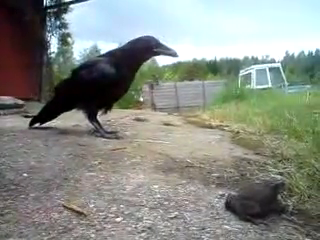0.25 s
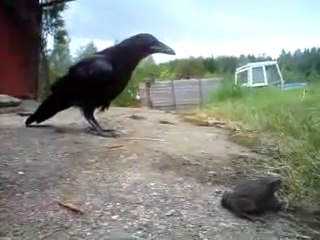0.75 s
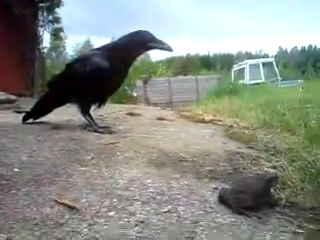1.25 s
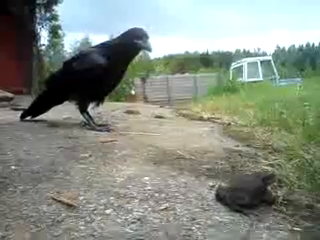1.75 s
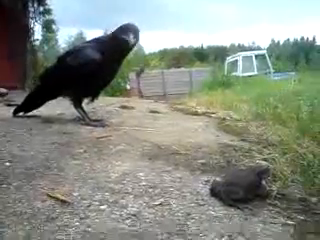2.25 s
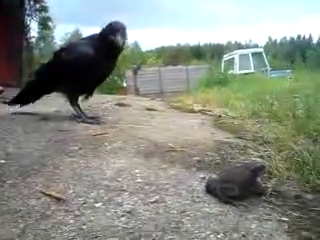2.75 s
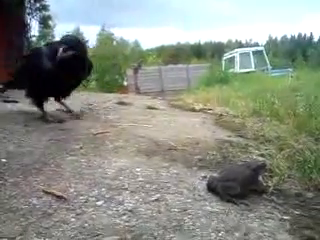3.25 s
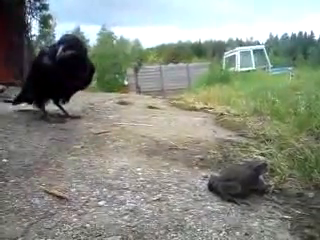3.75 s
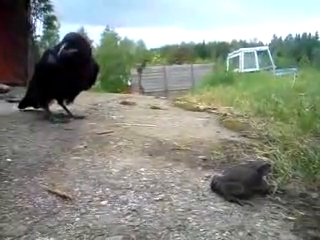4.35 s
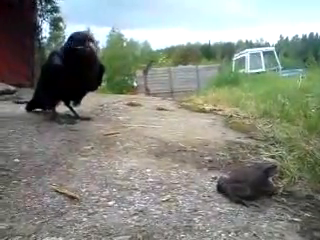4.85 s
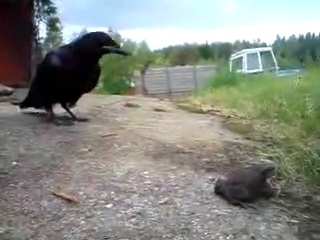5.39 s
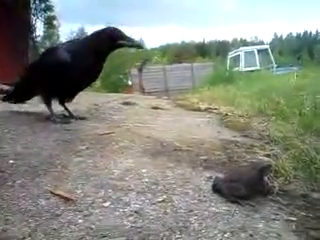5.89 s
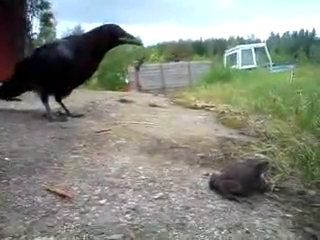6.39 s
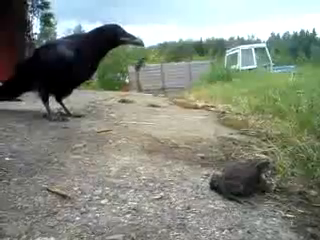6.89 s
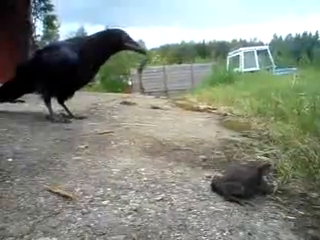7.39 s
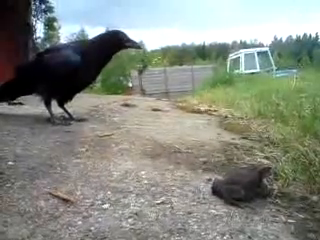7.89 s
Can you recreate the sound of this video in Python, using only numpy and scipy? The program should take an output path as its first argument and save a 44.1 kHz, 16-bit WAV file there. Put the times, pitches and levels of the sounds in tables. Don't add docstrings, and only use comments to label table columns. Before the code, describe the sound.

A large black bird gives four harsh, throaty croaks close by, with sharp bill clicks on stone and small songbirds whistling over soft leaf hiss.

```python
import sys
import numpy as np
from scipy import signal
from scipy.io import wavfile
from scipy.ndimage import uniform_filter1d

SR = 44100
rng = np.random.default_rng(int(sys.argv[2]) if len(sys.argv) > 2 else 0)


def natural_amplitude(level_db):
    exponent = np.asarray(level_db, float) / 20
    return 10 ** exponent


def master(y):
    cut = np.clip(np.atleast_2d(y).T, -1, 1)
    pcm = np.round(cut * 32767)
    wavfile.write(sys.argv[1], SR, pcm.astype(np.int16))


N = 358533


def evened(x):
    return x / np.sqrt(np.mean(x ** 2) + 1e-20)


def read(points, hz):
    f, value = np.transpose(points)
    return np.interp(np.log(hz + 1), np.log(f + 1), value)


def layer(sounds):
    track = np.zeros(N)
    for start, sound in sounds:
        part = track[round(start * SR):][:len(sound)]
        part += sound[:len(part)]
    return track


def drift(length, smooth):
    once = uniform_filter1d(rng.standard_normal(length), int(smooth))
    return evened(uniform_filter1d(once, int(smooth)))


def resonate(x, hz, width):
    return signal.lfilter(*signal.iirpeak(hz, hz / width, SR), x)


def lowpass(x, order, hz):
    return signal.sosfilt(signal.butter(order, hz, fs=SR, output="sos"), x)


def swells(rows, calm_db):
    t = np.arange(N) / SR
    power = natural_amplitude(calm_db) ** 2
    for start, db, half in rows:
        power = power + natural_amplitude(db) ** 2 * np.exp(-2 * ((t - start) / half) ** 2)
    return np.sqrt(power)


# (frequency [Hz], density [dB per Hz])
HISS_COLOUR = [(18, -31), (30, 0), (134, -21), (179, -11), (442, -7), (575, -8), (632, -8.5), (1230, -10.5),
               (1800, -10), (5140, -14), (5650, -15.5), (6840, -17), (8890, -26), (11600, -59),
               (19600, -120)]
# (time [s], peak level [dB], half length [s])
BREEZES = [
    (1.25, -49, 0.13),
    (3.15, -52.5, 0.5),
    (4.05, -56, 0.6),
    (5.3, -54, 1.22),
    (6.9, -52.5, 0.61),
]


def hiss(raven):
    still_db, haze_db, haze_s = -55, -25.5, 0.36
    frames, hz = N // 256 + 5, np.fft.rfftfreq(1024, 1 / SR)
    real, imaginary, patches = rng.standard_normal((frames, 513, 3)).T
    patches = evened(uniform_filter1d(uniform_filter1d(patches, size=12, axis=0), size=10, axis=1))
    spectrum = (real + 1j * imaginary) * natural_amplitude(read(HISS_COLOUR, hz)[:, None] + patches)
    noise = evened(signal.istft(spectrum, nperseg=1024, noverlap=768)[1][:N])
    keep = np.exp(-1 / (haze_s * SR))
    haze = natural_amplitude(haze_db) ** 2 * signal.lfilter([1 - keep], [1, -keep], raven ** 2)
    dull = lowpass(noise, 4, 7600)
    return swells(BREEZES, still_db) * noise + np.sqrt(haze) * dull[::-1]


# (time [s], peak level [dB], half length [s])
GUSTS = [(.9, -52.5, .05), (1.2, -60, 0.17), (1.315, -53, 0.038), (2.01, -55, .06), (2.15, -58, 0.041),
         (2.31, -56, .1), (2.8, -55, .15), (3.18, -55, .14), (3.87, -72, 0.083), (4.14, -58, 0.054),
         (4.66, -59, 0.39), (5.2, -62.5, 0.56), (5.59, -53, 0.04), (6.33, -54, 0.024), (6.64, -60, 0.072),
         (7.05, -61, 0.97), (7.86, -59, 0.088), (8.13, -58, 0.087)]


def wind():
    lumps = rng.standard_normal(N) * natural_amplitude(2.2 * drift(N, 900))
    low = signal.sosfilt(signal.butter(1, [35, 120], "band", fs=SR, output="sos"), lumps)
    return swells(GUSTS, calm_db=-63.5) * evened(lowpass(low, 2, 330))


def chirp(start, db, hz):
    u = np.linspace(0, 1, round(0.049 * SR))
    tremble = .04 * drift(len(u), 24)
    tone = np.sin(2 * np.pi * np.cumsum(hz * (1.07 - .14 * u + tremble)) / SR)
    return start, natural_amplitude(db - 8.0 + 6.6 * drift(len(u), 50)) * tone * np.sin(np.pi * np.sqrt(u))


# (time [s], peak level [dB], middle pitch [Hz])
CHIRPS = [(0.1795, -51.5, 5800), (0.283, -51, 5780), (0.381, -50.5, 5950), (0.4918, -48.5, 6000),
          (0.6264, -51, 5570), (0.7233, -52.5, 5970), (3.7563, -52, 5400), (3.8472, -44, 5070),
          (3.94, -44, 5390), (4.104, -51, 5300), (4.188, -45.5, 5220), (5.0194, -40, 5780),
          (5.129, -47, 5280), (5.226, -46.5, 6270), (5.7084, -51, 5900), (5.789, -53, 5300),
          (5.8754, -51.5, 5300), (7.644, -47, 5070), (7.7263, -45, 5640)]


def chirps():
    return layer(chirp(*row) for row in CHIRPS)


def whistle(start, length, db, start_hz, end_hz, blur, ease):
    u = np.linspace(1, 0, round(length * SR))
    hz = end_hz + (start_hz - end_hz) * u ** ease
    tone = np.sin(2 * np.pi * np.cumsum(hz * (1 + .004 * blur * drift(len(u), 90))) / SR)
    swell = signal.windows.tukey(len(u), .55)
    return start, np.sqrt(2) * natural_amplitude(db + 2.2 * blur * drift(len(u), 130)) * tone * swell


SLIDE_EASE = 1.2

# (time [s], length [s], level [dB], start pitch
# [Hz], end pitch [Hz])
FAR_NOTES = [(2.322, 0.026, -54, 4150, 4150), (2.36, .045, -61, 3700, 4150), (2.57, 0.044, -60, 1850, 2150),
             (2.71, 0.028, -53, 4400, 4130), (2.75, .05, -59, 3900, 4100), (2.84, 0.064, -54, 2350, 2960),
             (3.075, 0.048, -53, 2950, 2800), (3.31, 0.17, -55.5, 3600, 3430),
             (3.48, 0.017, -56, 3650, 4170), (4.114, .03, -47, 4400, 4500), (4.136, 0.024, -40, 4600, 4450),
             (4.17, 0.061, -59, 4500, 4300), (4.75, .075, -50.5, 2850, 2910),
             (6.18, 0.059, -62, 3500, 3560), (6.6, .04, -52, 3560, 3720),
             (.26, 0.12, -64, 4310, 4280), (.42, 0.13, -68, 4300, 4300), (.45, 0.067, -62, 4490, 4550),
              (.53, 0.17, -63.5, 4340, 4240), (7.45, .045, -59, 4950, 5100), (7.53, 0.1, -59, 5200, 4990),
              (7.615, .085, -75, 4890, 5100), (7.71, 0.042, -56.5, 5000, 4930),
              (8.07, .058, -59, 5150, 5150)]
# (time [s], length [s], level [dB], start pitch [Hz], end pitch [Hz])
SCRATCHES = [(3.9, .03, -58, 2750, 2950), (3.92, .03, -60, 3400, 3300), (3.93, .02, -56, 2900, 3100),
             (3.945, .03, -53, 2700, 2550), (3.965, .03, -54, 3250, 3450), (3.99, .04, -57, 2650, 2550),
             (3.995, .03, -60, 3300, 2950), (4.17, .05, -61, 2700, 2450), (5.945, .03, -59, 3700, 3300),
             (5.995, .02, -55, 3500, 3350), (6.01, .025, -56, 3100, 2850), (6.04, .05, -60, 3900, 3000)]


def distant_birds():
    whistles = layer(whistle(*row, 1.6, SLIDE_EASE) for row in FAR_NOTES)
    return whistles + layer(whistle(*row, 3, SLIDE_EASE) for row in SCRATCHES)


def click(start, db, hz, ring_ms, knock_db, rustle_db):
    t = np.arange(round(.25 * SR)) / SR
    ring = np.sin(2 * np.pi * hz * t) * np.exp(-1000 * t / ring_ms) * np.minimum(t / .0002, 1)
    knock = np.sin(2 * np.pi * 1250 * t) * np.exp(-t / .0009) * np.minimum(t / .0006, 1)
    grit = rng.standard_normal(len(t)) * natural_amplitude(4.8 * drift(len(t), 40))
    rustle = evened(resonate(resonate(grit, 3000, 4000), 2500, 8200)) * np.exp(-t / 0.046)
    return start, natural_amplitude(db) * (ring + natural_amplitude(knock_db) * knock + natural_amplitude(rustle_db) * rustle)


# (time [s], peak level [dB], ring pitch [Hz], low knock [dB])
STEPS = [
    (0.4228, -31, 2150, -6),
    (2.3213, -30, 3930, 0),
    (3.0182, -26, 3850, -15),
    (3.553, -31.5, 4000, -20),
    (6.31, -30, 3500, 4.5),
]


def claw_steps():
    return layer(click(s, db, hz, 0.78, knock_db, rustle_db=-19) for s, db, hz, knock_db in STEPS)


def gesture(call, attack_s, release_s, depth):
    start, length, db, top_hz, crest = call
    age = np.arange(0, length, 1 / SR)
    u, dying = age / length, np.clip(1 - (length - age) / release_s, 0, 1)
    effort_db = db - 22 * np.exp(-(age / attack_s) ** 1.4) - 20 * dying ** 1.4
    rising = (1 - .73) * np.clip(1 - u / crest, 0, 1) ** 2.1
    falling = (1 - .62) * np.clip((u - crest) / (1 - crest), 0, 1) ** 3.8
    rest = np.clip((age + 0.062 - length) / .015, 0, 1)
    throb_depth = depth * (1 - (1 - .25) * rest) + 0.734 * np.exp(-age / 0.03)
    return start + age, effort_db, top_hz * (1 - rising - falling), throb_depth


def vocal_folds(shape, rough, throb, colour):
    t, _, hz, depth = shape
    first_s, early, late = throb
    swing, under, low_db, _ = colour
    age, n = t - t[0], len(t)
    fresh = np.exp(-age / .018)
    rate = (early + (late - early) * age / age[-1]) * (1 + .35 * fresh)
    rate = rate * (1 + .45 * rough * drift(n, 260))
    flap = 2 * np.pi * (np.cumsum(rate) / SR - (first_s - t[0]) * rate[0])
    squeeze = np.exp((depth + 3.5 * fresh) * (np.cos(flap) - 1)) * natural_amplitude(5.0 * rough * drift(n, 220))
    dip = swing * np.minimum(2 * depth, 1) * (1 + np.sin(flap - .8)) ** 2 / 2
    bend = 1 - dip + .13 * rough * drift(n, 80)
    turns = 2 * np.pi * np.cumsum(hz * bend) / SR
    uneven = 1 + np.minimum(under, .45) * (1 + drift(n, 500)) * np.cos(turns / 2)
    lag = .3 * np.arange(14) ** 2
    fundamental = natural_amplitude(low_db - 19 * np.log2(hz / 609)) * np.cos(turns)
    upper = sum(np.cos(k * turns - lag[k]) for k in range(2, 14))
    folds = evened(fundamental + uneven * upper)
    puffs = evened((0.13 + np.maximum(folds, 0)) * rng.standard_normal(n))
    return squeeze, folds, puffs


# (centre [Hz], width [Hz], level [dB])
THROAT = [(546, 910, -7), (1168, 734, 5), (1580, 590, -19.5), (1926, 750, -9), (2713, 375, 2),
          (3150, 333, -2.5), (4530, 965, -16.5), (5630, 940, -16), (6900, 380, -46)]


def croak(shape, rough, throb, colour):
    t, effort_db, _, _ = shape
    age = t - t[0]
    squeeze, folds, puffs = vocal_folds(shape, rough, throb, colour)
    drive = squeeze * ((1 - rough) * folds + .8 * rough * puffs)
    bands = []
    for k, (hz, width, db) in enumerate(THROAT):
        bands.append((-1) ** k * natural_amplitude(db) * resonate(resonate(drive, hz, width), hz, 2 * width))
    rasp = natural_amplitude(-26.5) * np.sqrt(squeeze) * resonate(resonate(puffs, 4900, 2200), 4900, 2600)
    gape = natural_amplitude(colour[3]) * (1 - np.exp(-(age / 0.031) ** 2))
    closing = natural_amplitude(0.28 * (effort_db - effort_db.max()) * (age > age[-1] / 2))
    voice = sum(bands[:2]) + closing * (sum(bands[2:-3]) + gape * (sum(bands[-3:]) + rasp))
    voice = signal.sosfilt(signal.butter(8, 390, "high", fs=SR, output="sos"), voice)
    voice = lowpass(voice, 5, 6300)
    steady = np.sqrt(uniform_filter1d(voice ** 2, size=1800, mode="nearest") + 1e-12)
    return t[0], natural_amplitude(effort_db) * voice / steady * signal.windows.tukey(len(t), .02)


# (time [s], length [s], effort level [dB], top pitch [Hz], pitch crest [share of length])
CROAKS = [
    (0.847, 0.28, -25, 671.2, 0.64),
    (4.361, 0.36, -20, 651.7, 0.58),
    (6.838, .422, -21, 676.3, .55),
    (7.768, 0.27, -21, 663.3, 0.53),
]
# (first throb time [s], early rate [per s], late rate [per s])
THROBS = [(.8495, 79, 62), (4.366, 76, 65), (6.8425, 78, 74), (7.773, 75, 65)]
# (pitch swing [share], half-pitch undertone [share], fundamental [dB], top [dB])
COLOURS = [(0.12, 0.51, 2.5, -1), (0.095, 0.11, -3.5, 3), (.12, 0.22, -3.5, -1.5), (0.12, 0.17, -4, 0)]
ROUGH = [.3, .17, .32, .24]
ATTACK_S = [0.031, 0.025, 0.018, 0.018]
RELEASE_S = [0.072, 0.07, 0.077, 0.021]
DEPTHS = [.6, .8, .5, .5]


def raven_croaks():
    shapes = map(gesture, CROAKS, ATTACK_S, RELEASE_S, DEPTHS)
    return layer(map(croak, shapes, ROUGH, THROBS, COLOURS))


# (frequency [Hz], decay by 60 dB [s])
YARD = [(500, 0.36), (1200, 0.72), (2600, 0.52), (5000, 1.13), (8000, 0.033)]


def echoes(x, gap_s, stretch):
    hz, t, z = signal.stft(rng.standard_normal(SR), SR, nperseg=256)
    decay = natural_amplitude(-60 * t / (stretch * read(YARD, hz)[:, None]))
    tail = signal.istft(z * decay, SR, nperseg=256)[1]
    tail *= np.arange(len(tail)) > gap_s * SR
    return signal.fftconvolve(x, tail / np.linalg.norm(tail))[:N]


def thump(start, db, hz):
    u = np.linspace(0, 1, round(0.032 * SR))
    tone = np.sin(2 * np.pi * np.cumsum(hz * (1.15 - 0.18 * u)) / SR)
    return start, natural_amplitude(db) * tone * np.sin(np.pi * u) ** 2


# (time [s], peak level [dB], pitch [Hz])
THUMPS = [(1.299, -46, 126), (1.33, -43, 110), (1.999, -45, 130), (2.14, -50, 120), (2.87, -48, 115),
          (4.13, -54, 110), (6.321, -50, 119)]


def wind_thumps():
    return layer(thump(*row) for row in THUMPS)


# (time [s], peak level [dB], ring pitch [Hz], ring time [ms], low knock [dB])
PECKS = [
    (2.677, -14.5, 2940, 0.44, -24),
    (3.03, -8.5, 4080, 0.15, -27),
    (3.032, -18.5, 5700, 0.35, -18),
    (3.034, -27, 3000, 0.43, -12),
    (6.5515, -23, 3800, 1.2, -23),
    (6.5536, -6.5, 3900, 0.31, -9),
]


def bill_pecks():
    return layer(click(*row, rustle_db=-36) for row in PECKS)


# (time [s], length [s], level [dB], start pitch [Hz], end pitch [Hz])
SLIDES = [(3.395, 0.081, -47.5, 2270, 2060), (4.22, 0.078, -47.5, 2310, 2060),
          (4.924, 0.031, -34.5, 3540, 3350), (5.143, 0.12, -40.5, 3700, 4040),
          (5.204, 0.071, -36.5, 3660, 4090), (5.268, 0.047, -38, 4095, 3730),
          (5.368, 0.023, -44, 2940, 2400), (5.387, 0.0095, -61, 2420, 2580), (5.429, .03, -53, 2780, 2420),
          (5.682, 0.093, -46.5, 2380, 2800), (5.762, 0.058, -51, 2520, 2770),
          (7.615, 0.076, -58, 2500, 2790), (7.677, 0.061, -62, 2780, 2430)]
# (time [s], length [s], level [dB], start pitch [Hz], end pitch [Hz])
SONG = [(4.777, 0.091, -46.5, 3400, 3194), (4.852, 0.077, -46.5, 3150, 3140),
        (4.868, .035, -41, 3590, 3420), (4.898, 0.054, -40, 3720, 3780), (4.95, 0.051, -38, 3355, 3790),
        (5.468, 0.058, -47, 3730, 3470), (5.527, 0.048, -33.5, 3760, 3440),
        (5.316, 0.071, -47.5, 2030, 2880), (5.392, 0.042, -51, 2670, 2855),
        (5.55, 0.054, -45.5, 3250, 2860), (5.61, 0.039, -46, 3330, 2860), (5.747, 0.17, -53, 2820, 2970),
        (5.948, 0.088, -49, 3100, 2420), (6.025, 0.074, -51.5, 2515, 2423), (6.09, 0.08, -58, 2440, 2470)]


def songbird():
    slides = layer(whistle(*row, .7, SLIDE_EASE) for row in SLIDES)
    return slides + layer(whistle(*row, 1, 3.3) for row in SONG)


def chip(start, db, start_hz, end_hz, length):
    u = np.linspace(0, 1, round(length * SR))
    tone = np.sin(2 * np.pi * np.cumsum(start_hz + (end_hz - start_hz) * u) / SR)
    return start, natural_amplitude(db) * tone * np.sin(np.pi * u)


# (time [s], peak level [dB], start pitch [Hz], end pitch [Hz], length [s])
CHIPS = [(5.717, -50, 4400, 5600, .006), (5.79, -48, 4600, 6300, .008), (5.877, -50, 4700, 6400, .009),
         (5.94, -44, 4000, 6600, .008), (5.957, -45, 5600, 6700, .008), (5.967, -37, 4400, 6200, .008),
         (5.983, -46, 4900, 5800, .004), (6.014, -42, 4000, 6800, .011), (6.026, -45, 3900, 5800, .008),
         (6.036, -47, 5800, 6600, .007), (6.046, -37, 4300, 5700, .007)]


def chips():
    return layer(chip(*row) for row in CHIPS)


def scene():
    raven = raven_croaks()
    walls = natural_amplitude(-10) * echoes(raven, .006, .22)
    woods = natural_amplitude(-21.5) * echoes(raven, .04, 0.78) + natural_amplitude(-31.5) * echoes(raven, 0.3, 1.0)
    ground = claw_steps() + bill_pecks()
    birds, singer, small = distant_birds(), songbird(), chirps() + chips()
    song = birds + singer + echoes(natural_amplitude(-11) * birds + natural_amplitude(-14) * singer, .008, .45)
    far = song + small + natural_amplitude(-7) * echoes(small, .006, .3)
    air = hiss(raven) + wind() + wind_thumps()
    return (raven + walls + woods + ground + far + air)[None]


def low_pass(x):
    return signal.sosfilt(signal.butter(12, 9040, fs=SR, output="sos"), x)


def record(dry):
    dull = signal.sosfilt(signal.cheby2(8, 45, 9500, fs=SR, output="sos"), dry)
    return low_pass(dull)


dry = scene()
out = record(dry)
master(out)
```